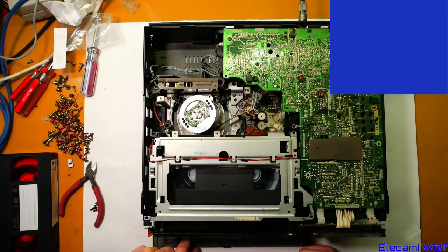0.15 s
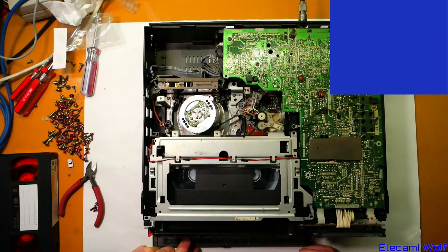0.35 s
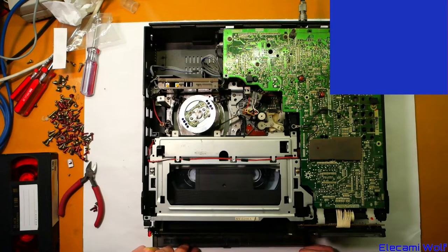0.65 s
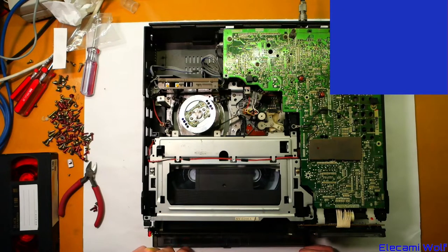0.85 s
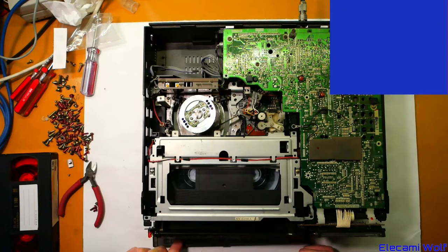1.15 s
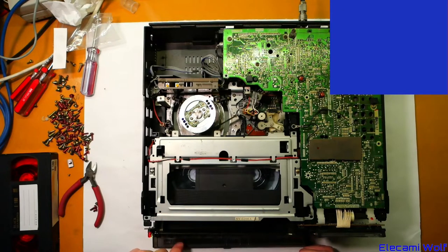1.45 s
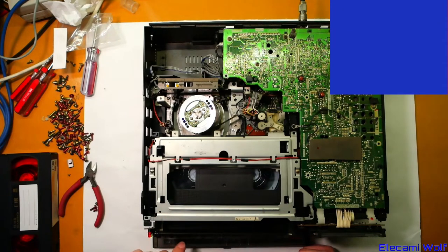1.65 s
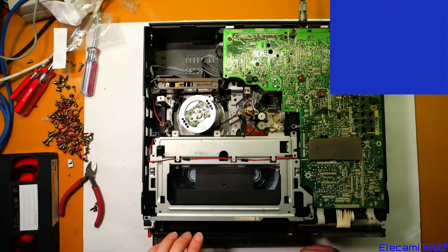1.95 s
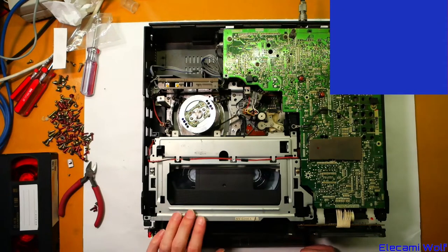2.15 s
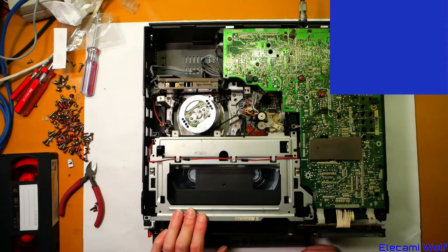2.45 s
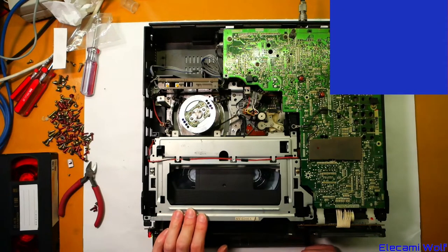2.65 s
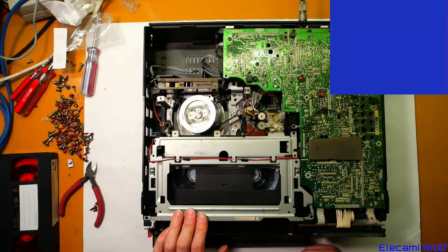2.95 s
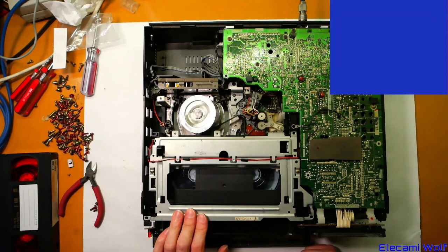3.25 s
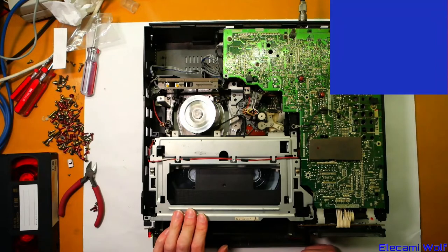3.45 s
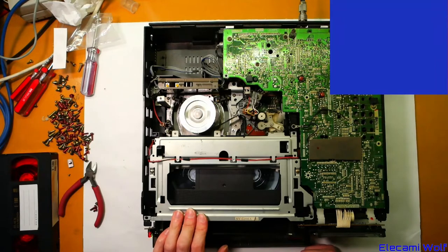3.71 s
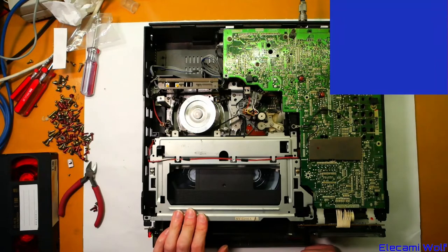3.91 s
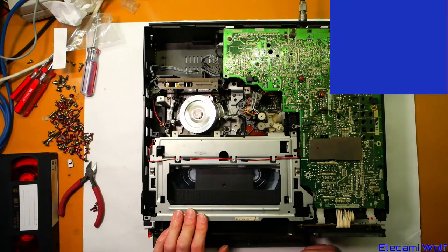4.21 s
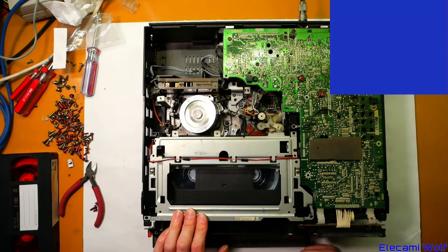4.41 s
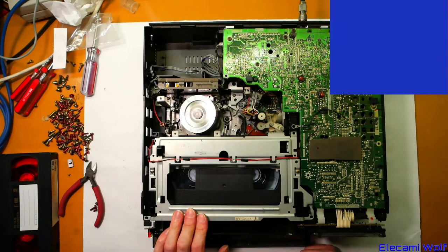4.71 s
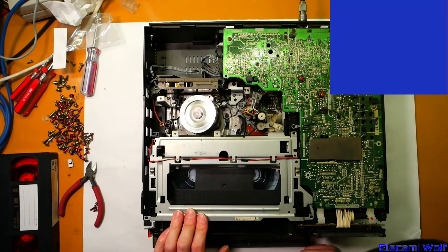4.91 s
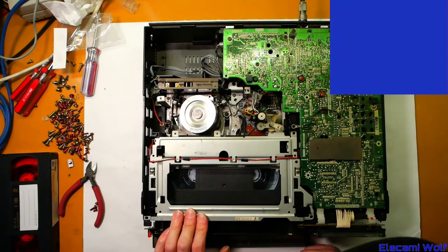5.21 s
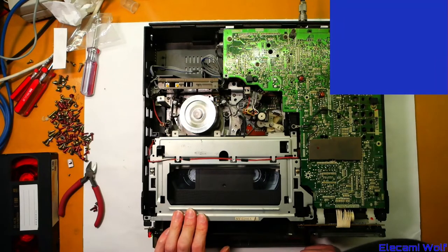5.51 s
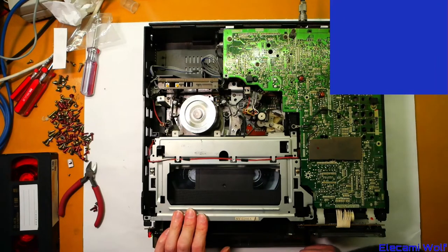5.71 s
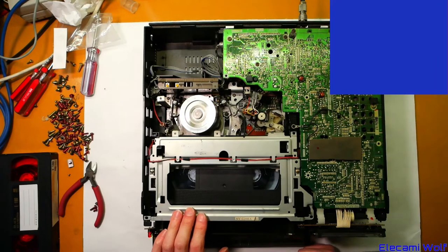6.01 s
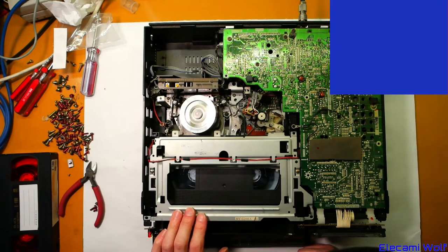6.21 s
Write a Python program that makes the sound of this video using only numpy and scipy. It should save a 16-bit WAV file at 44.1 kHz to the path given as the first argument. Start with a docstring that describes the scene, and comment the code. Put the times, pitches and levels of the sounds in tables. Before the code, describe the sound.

A tape machine with its cover off, heard closely in stereo in a small quiet room. Gritty motor whir and rattling clicks come first, ending in a heavy metallic clunk with a short ring. Tray and tape path shuffle, levers snap, a low uneven drum hum rises with thin whines, a reel ticks rapidly, and a final latch fades into faint buzzing. Gated gaps drop abruptly quieter between sounds.

```python
"""Open video recorder on a workbench

The loading motor grinds through its gears and stops with a clunk; levers click and latch, tray and tape
path shuffle, then the drum hums and whines, a reel ticks and a faint buzz ends it. Motors and rubs are
shaped noise, the hum adds wavering lines, contacts are noise bursts plus damped modes. The whole level
jumps up in bursts, holds and sinks to a lower floor, over a faint hiss.
"""
import sys
import numpy as np
from scipy import signal
from scipy.fft import rfft, irfft, next_fast_len
from scipy.io import wavfile
from scipy.ndimage import uniform_filter1d, map_coordinates

SR = 44100
rng = np.random.default_rng(int(sys.argv[2]) if len(sys.argv) > 2 else 0)


def wav_record(signal):
    """Record a signal, one row per channel, as 16-bit PCM in the file named by sys.argv[1]."""
    frames = np.transpose(np.atleast_2d(signal))
    bounded = np.clip(frames, -1, 1)
    # unit amplitude maps onto the largest positive 16-bit level
    quanta = np.round(bounded * 32767).astype(np.int16)
    wavfile.write(sys.argv[1], SR, quanta)


N = 280608
TIME = np.arange(N) / SR  # s
# left-right correlation of the machine noise: f/Hz, correlation
MACHINE_ALIKE = [(60, 0.33), (150, 0.71), (380, 0.79), (950, 0.63), (2380, 0.42), (5980, 0.32),
                 (15000, 0.94)]


def amp(db):
    """Gain of a dB value."""
    return 10 ** (np.asarray(db) / 20)


def unit(x):
    """x at rms 1."""
    return x / np.sqrt(np.mean(x ** 2) + 1e-20)


def along(points, hz):
    """Interpolate (f/Hz, value) points on a log frequency axis."""
    f, v = np.transpose(points)
    return np.interp(np.log(hz + 1), np.log(f + 1), v)


def gains(rows):
    """One gain curve per dB column after the time; -120 dB outside the table."""
    s, *columns = np.transpose(rows)
    return [amp(np.interp(TIME, s, db, left=-120, right=-120)) for db in columns]


def wobble(rate_hz):
    """Smooth random curve through rate_hz normal knots a second."""
    knots = rng.standard_normal(int(N * rate_hz / SR) + 4)
    return map_coordinates(knots, [TIME * rate_hz])


def filtered(x, response):
    """x through a complex frequency response, by FFT."""
    m = next_fast_len(N + SR // 2)
    return irfft(rfft(x, m) * response(np.fft.rfftfreq(m, 1 / SR)), m)[..., :N]


def resonances(modes):
    """Response of second-order bandpasses (f/Hz, width/Hz, level/dB) summed with alternating sign."""
    def response(f):
        total = 0
        for k, (centre, width, db) in enumerate(modes):
            damping = 1j * f * width
            total = total + (-1) ** k * amp(db) * damping / (centre * centre - f * f + damping)
        return total
    return response


def shape(spectrum):
    """Zero-phase response of a (f/Hz, level/dB) spectrum."""
    return lambda f: amp(along(spectrum, f))


def pair(response, alike, grain=1):
    """Stereo noise of rms 1 with a set left-right correlation and a shared grain."""
    def mid_side(f):
        angle = np.arccos(np.clip(along(alike, f), -1, 1)) / 2
        return response(f) * [np.cos(angle), np.sin(angle)]
    mid, side = filtered(grain * rng.standard_normal((2, N)), mid_side)
    return unit(np.array([mid + side, mid - side]))


def room():
    """Steady room noise with its own spectrum and left-right correlation."""
    # spectrum: f/Hz, relative level/dB
    room_spectrum = [(15, -49), (25, -19.5), (69, -18), (160, -7), (215, -13), (410, -8), (582, -19),
                     (997, -17.5), (1080, -17), (1270, -23.5), (3000, -20), (3440, -25.5), (5880, -29.5),
                     (9050, -43.5), (15500, -53)]
    # left-right correlation: f/Hz, correlation
    room_alike = [(60, 0.17), (240, 0.62), (950, 0.11), (3770, 0.18), (15000, 0.31)]
    return amp(-53) * pair(shape(room_spectrum), room_alike)


def loader():
    """Gear teeth chatter unevenly into the frame's resonances; the chassis drones below."""
    # motor level, falling away from the first clunk: t/s, level/dB
    motor_levels = [(0, -39), (.07, -35), (.13, -35), (.19, -43), (.29, -48), (.32, -37.5), (.41, -37),
                    (.47, -46), (.51, -38.5), (.95, -37), (1.05, -39.5), (1.15, -38), (1.2, -62.5),
                    (1.35, -78.5)]
    # frame resonances: f/Hz, width/Hz, relative level/dB
    gear_modes = [(1133, 13, -13.5), (1332, 15, 2.5), (1740, 28, -2), (2185, 15, 4.5), (2840, 33, -8.5),
                  (3497, 62, -6.5), (3515, 37, -14), (3870, 45, -7.5), (4333, 150, -15.5), (4780, 290, -9),
                  (6100, 32, -27.5), (7200, 130, -25.5)]
    # broad grinding: f/Hz, relative level/dB
    grind_spectrum = [(530, -39.5), (900, -6.5), (1230, -12.5), (1350, -7), (1580, -15.5), (1670, -2.5),
                      (1770, 0.5), (2440, -6), (4980, -17), (6120, -22), (8260, -26), (14000, -55.5)]
    # chassis drone: f/Hz, relative level/dB
    drone_spectrum = [(35, -46.5), (60, -17), (92, -4.5), (158, -3.5), (273, -6), (310, -4), (475, -11.5),
                      (531, 0.5), (580, -9), (727, 2), (994, -8.5), (1110, -8), (1200, -11), (1560, -37.5),
                      (2640, -120)]

    def frame(f):
        modes = resonances(gear_modes)(f) * (f > 900) / (1 + (f / 6000) ** 4)
        return .45 * shape(grind_spectrum)(f) + .9 * modes

    grind_gain, = gains(motor_levels)
    drone_gain = amp(-45.5) * np.minimum(1, grind_gain / amp(-46))  # even while the grind is above -46 dB
    teeth = amp(1.9 * wobble(400))
    grind = grind_gain * pair(frame, MACHINE_ALIKE, teeth)
    drone = drone_gain * pair(shape(drone_spectrum), MACHINE_ALIKE, amp(1.5 * wobble(40)))
    return grind + drone


def ring(start_s, hz, db, t60_s, attack_s):
    """One damped sine mode with a soft attack."""
    t = np.maximum(TIME - start_s, 0)
    return amp(db - 60 * t / t60_s) * (1 - np.exp(-t / attack_s)) * np.sin(2 * np.pi * hz * t)


def contacts():
    """Each contact is a rattle dying band by band, a longer room tail and chassis modes at new strengths."""
    # small plastic contacts: t/s, level/dB, knock/dB, snap/dB (last two relative)
    clicks = [(.0313, -33.5, -5, -30), (0.0536, -35, -3, -25), (0.073, -38, -26, -20),
              (0.098, -29.5, -24, -30), (.1155, -30, -7.5, -30), (0.1398, -30.5, -9.5, -30),
              (0.187, -29, -18, -18), (0.497, -37, -19, -11), (1.039, -28.5, -25, -12),
              (1.0797, -31, -23, -10), (1.1122, -29, -31, -7), (1.3242, -31.5, -7, 0),
              (1.5449, -41, -4.5, -10.5), (1.7446, -45, 11, -19), (1.773, -42, 8, -32),
              (1.785, -44.5, 7, -23), (1.8667, -40.5, 6, -25), (2.5482, -27.5, -4.5, -3),
              (2.6638, -40, -11, -25), (2.7526, -32, -22.5, -6.5), (2.7663, -40, -6, -5),
              (2.8791, -49.5, 3.5, -15.5), (3.1125, -46.5, 7.5, -15), (3.1386, -40, -6.5, -20),
              (3.156, -44, -2, -8), (3.3035, -49, 7, -14), (3.5107, -32, -11, -3.5), (3.5354, -32, -14, -4),
              (3.5814, -40, -7, -10), (4.0946, -35.5, -20, -10.5), (4.125, -43, -17, 1),
              (4.1973, -32, -16, -8), (4.2614, -30.5, -25, -5), (4.285, -42, -16, -17),
              (4.6245, -35.5, -6.5, -14), (4.8466, -40.5, -2, -20), (5.2307, -48, 7, -3),
              (5.493, -31.5, -14, -5), (5.5487, -32, -15, -25), (5.681, -44.5, -4, -9)]
    # levers latching: t/s, level/dB, thud/dB, knock/dB, snap/dB, fizz/dB (last four relative), base t60/s
    clunks = [(1.155, -5.5, -15.5, -10.5, -9, -14, 0.091), (1.1683, -10.5, -27, -8, -6, 0.5, 0.13),
              (1.5918, -19, -10.5, -3, 0, -7, 0.091), (2.552, -8.5, -23, -6.5, -1.6, -2.5, 0.064),
              (3.5204, -24.5, -40, -7.5, -2, -29, 0.1), (5.5073, -20, -7.5, -1.5, 1.1, -6, .11),
              (5.9654, -11.5, -23.5, -9, -0.8, -24, 0.056)]
    # rattle bands, thud to fizz: low edge f/Hz, high edge f/Hz, decay factor on t60
    bands = [(85, 270, 2.2), (410, 1200, 1.2), (1200, 3460, 0.86), (4250, 5200, 0.81), (7040, 3800, 0.65)]
    # chassis modes: f/Hz, relative level/dB, t60/s
    chassis = [(190, -2, 0.37), (615, 2, 0.15), (742, -5, 0.1), (799, -0.5, 0.15), (915, -7.5, 0.22),
               (1200, -9, 0.076), (1400, -7, 0.07), (1834, -5, 0.12), (1982, -4.5, .11), (2104, -8, 0.083),
               (2375, -9.5, 0.073), (2790, -8.5, 0.11), (3200, -8, 0.047), (5800, -14, 0.058),
               (6200, -12.5, 0.064)]
    # loose parts left ringing (bench thump, spring, plate): t/s, f/Hz, level before attack/dB, t60/s, attack/s
    loose_parts = [(1.07, 49.6, -33, 0.26, 0.022), (1.17, 1124, -32.5, 0.89, .004),
                   (1.17, 588.4, -37, 0.42, .006), (2.552, 1200, -39.5, 0.33, 0.0043),
                   (5.969, 2390, -40, 0.41, .003)]
    # left-right correlation of the rattle: f/Hz, correlation
    blow_alike = [(100, 1), (700, 0.95), (2000, 0.68), (5000, 0.76), (12000, 0.8)]
    # phase lead of left over right: f/Hz, lead/rad
    left_lead = [(100, .3), (700, -0.56), (1200, -0.51), (2500, -1.05), (4000, -1.9), (7000, -0.68),
                 (15000, -0.83)]
    thud_under_knock_db, fizz_under_snap_db, click_t60_s = -6, -12.5, .065
    left_minus_right_db = -0.3

    hits = list(clunks)
    for s, db, knock, snap in clicks:
        hits.append((s, db, knock + thud_under_knock_db, knock, snap, snap + fizz_under_snap_db, click_t60_s))

    t = np.arange(SR // 2) / SR
    envelopes, modes = np.zeros((len(bands), 2, N + SR)), np.zeros((2, N + SR))
    scatter_db = rng.normal(0, 1.6, (len(hits), len(chassis)))
    mode_waves = np.array([amp(db - 60 * t / t60) * np.sin(2 * np.pi * hz * t) for hz, db, t60 in chassis])
    mode_hz = np.transpose(chassis)[0]
    for (s, db, thud, knock, snap, fizz, t60), spread in zip(hits, scatter_db):
        at = slice(round(s * SR), round(s * SR) + len(t))
        for envelope, level, (_, _, slow) in zip(envelopes, (thud, knock, 0, snap, fizz), bands):
            rattle_decay = amp(-60 * t / (t60 * slow))
            room_tail = amp(-20.5 - 60 * t / (.42 * slow))
            crack = 1.3 * amp(-60 * t / 0.013)
            onset = 1 - np.exp(-t / (0.00051 * slow ** 2))
            envelope[:, at] += amp(db + level - 7) * (rattle_decay + room_tail + crack) * onset
        colour_db = np.select([mode_hz < 400, mode_hz < 1200, mode_hz > 4000], [thud, knock, snap])
        modes[:, at] += amp(db + colour_db + spread - 14.5) @ mode_waves

    def low_pass(f, hz):
        return 1 / (1 + (f / hz) ** 6)

    grain = amp(1.8 * wobble(450))
    blows = sum(ring(*row) for row in loose_parts)
    for envelope, (low_hz, high_hz, _) in zip(envelopes, bands):
        noise = pair(lambda f: low_pass(f, high_hz) ** 0.78 * (1 - low_pass(f, low_hz)), blow_alike, grain)
        # high-pass limits the spill of sudden starts below the band
        blows = blows + filtered(envelope[:, :N] * noise, lambda f: 1 / (1 - 1j * .6 * low_hz / (f + 1)) ** 2)
    blows = blows + filtered(modes[:, :N], lambda f: 1 / (1 - 1j * 90 / (f + 1)) ** 2)

    def placement(f):
        left = amp(left_minus_right_db / 2) * np.exp(.5j * along(left_lead, f))
        return left ** np.array([[1], [-1]])  # right is the inverse

    return filtered(blows, placement)


def shuffle():
    """Tray and tape path: a low scrape through the bench and a grainy rub above it."""
    # t/s, rumble level/dB, rub level/dB
    shuffle_levels = [(1.2, -56, -77), (1.35, -48.5, -51), (1.62, -52.5, -58.5), (1.85, -43.5, -53),
                      (1.98, -50, -56.5), (2.05, -65.5, -67.5), (2.5, -82.5, -77.5), (2.6, -49.5, -52.5),
                      (3.0, -53, -57), (3.7, -50.5, -52.5), (3.95, -56.5, -57), (4.22, -50.5, -50),
                      (4.6, -55.5, -55.5), (5.4, -52.5, -56), (5.55, -49.5, -52.5), (5.7, -49, -50),
                      (5.85, -57, -60.5), (6.37, -60.5, -62.5)]
    # low scrape: f/Hz, relative level/dB
    rumble_spectrum = [(24, -38), (40, -7.5), (69, -4.5), (172, 0.5), (275, -4.5), (423, -3), (483, -7),
                       (599, -10.5), (700, -13.5), (910, -39.5), (1540, -120)]
    # rub: f/Hz, relative level/dB
    rub_spectrum = [(350, -34.5), (600, -7.5), (741, -3.5), (1000, -10.5), (1410, -11), (2390, -11),
                    (3420, -19), (4330, -17.5), (5010, -21.5), (7840, -28), (14000, -52.5)]
    rumble_gain, rub_gain = gains(shuffle_levels)
    rub_grain = amp(2.3 * wobble(300) + 1.5 * wobble(40))
    rumble = rumble_gain * pair(shape(rumble_spectrum), MACHINE_ALIKE, amp(1.2 * wobble(30)))
    return rumble + rub_gain * pair(shape(rub_spectrum), MACHINE_ALIKE, rub_grain)


def swell(start_s, end_s, db):
    """Gain that fades in, holds and fades out, straight in dB."""
    fade_s, drop_db = 0.038, 19
    times = [start_s - fade_s, start_s, end_s, end_s + fade_s]
    levels = [db - drop_db, db, db, db - drop_db]
    return amp(np.interp(TIME, times, levels, left=-120, right=-120))


def drum():
    """Hum is resonant noise plus two wavering lines; whine and whistle are rough narrow noise bands."""
    # drum hum runs up, rises and falls unevenly, runs down: t/s, level/dB
    drum_levels = [(2.6, -77), (2.8, -57.5), (3.3, -49), (3.5, -55.5), (3.6, -50.5), (4.05, -54),
                   (4.2, -44.5), (4.4, -51.5), (4.75, -52), (4.9, -49.5), (5.2, -47), (5.35, -51.5),
                   (5.52, -42.5), (5.7, -53), (5.8, -69), (6.36, -73.5)]
    # hum resonances before the 1.3 power: f/Hz, width/Hz, relative level/dB
    hum_modes = [(182, 14, 0), (370, 12, -10.5), (550, 24, -4.5), (612, 55, -7.5), (730.7, 22, 1.5),
                 (882.3, 30, -6)]
    # wavering hum lines: centre f/Hz, median level over the hum gain/dB, pitch wander/Hz
    cogging = [(357, -6, 1.1), (755, -11, 8.2)]
    # whine resonance before squaring: f/Hz, width/Hz, relative level/dB
    whine_modes = [(2420, 59, 0)]
    # whine comes and goes: start t/s, end t/s, level/dB
    whine_swells = [(3.6, 3.85, -57.5), (4.136, 4.496, -55.5), (4.643, 4.917, -57), (5.13, 5.22, -57),
                    (5.425, 5.495, -59.5)]
    # lower whistle's resonance before squaring: f/Hz, width/Hz, relative level/dB
    whistle_modes = [(1604, 60, 0)]
    # whistle during run-up: start t/s, end t/s, level/dB
    whistle_span = (2.8, 3.45, -63.5)

    def narrow(modes):
        return pair(lambda f: resonances(modes)(f) ** 2, MACHINE_ALIKE)

    hum_gain, = gains(drum_levels)
    lines = 0
    for hz, db, wander_hz in cogging:
        phase = 2 * np.pi * np.cumsum(hz + wander_hz * wobble(13)) / SR
        lines = lines + amp(db + wobble(25)) * np.sin(phase)
    body = pair(lambda f: np.abs(resonances(hum_modes)(f)) ** 1.3, MACHINE_ALIKE, amp(2.8 * wobble(30)))
    whine = sum(swell(*row) for row in whine_swells) * narrow(whine_modes)
    whistle = swell(*whistle_span) * narrow(whistle_modes)
    return hum_gain * (body + lines) + whine + whistle


def reel():
    """A turning reel ticks once a turn, slightly uneven in time and strength, into short plastic modes."""
    # first t/s, end t/s, period/s
    first_s, end_s, period_s = (4.575, 5.92, .0678)
    # tick modes: f/Hz, relative level/dB, t60/s
    tick_modes = [(4350, -0.5, 0.0076), (3350, -7.5, .008), (5180, -7.5, 0.008), (725, 3, .07)]
    times = np.arange(first_s, end_s, period_s)
    chance = rng.standard_normal((len(times), 2))
    impulses, t = np.zeros(N), np.arange(SR // 20) / SR
    at = np.round((times + .0008 * chance[:, 0]) * SR).astype(int)
    impulses[at] = amp(-49.5 + 2.0 * chance[:, 1])
    tick = sum(amp(db - 60 * t / t60) * np.sin(2 * np.pi * hz * t) for hz, db, t60 in tick_modes)
    return signal.fftconvolve(impulses, tick)[:N]


def buzz():
    """As the drum dies away, regular blips of uneven size excite one short mode."""
    # start t/s, rate/Hz
    start_s, rate_hz = (5.866, 50)
    # f/Hz, median level before attack/dB, t60/s
    hz, db, t60_s = (1730, -49.5, 0.02)
    times = np.arange(start_s, N / SR, 1 / rate_hz)
    impulses, t = np.zeros(N), np.arange(SR // 20) / SR
    impulses[(times * SR).astype(int)] = amp(db + 3.2 * rng.standard_normal(len(times)))
    blip = amp(-60 * t / t60_s) * (1 - np.exp(-t / .001)) * np.sin(2 * np.pi * hz * t)
    return signal.fftconvolve(impulses, blip)[:N]


def burst_gain():
    """Gain of the whole sound: a jump within a few ms, a hold, then a fade straight in amplitude."""
    # jump t/s, fade start t/s, fade/s
    burst_times = [(0, .138, 0.082), (0.188, 0.224, 0.095), (.292, 0.443, 0.063), (0.497, 1.299, 0.17),
                   (1.544, 1.65, 0.13), (1.745, 1.776, 0.1), (1.848, 1.881, .15), (2.543, 2.603, .16),
                   (2.754, 2.765, 0.17), (2.88, 2.889, 0.11), (3.113, 3.132, 0.14), (3.3, 3.317, 0.095),
                   (3.51, 3.573, 0.12), (3.712, 3.756, .12), (4.094, 4.292, .12), (4.625, 4.645, 0.1),
                   (4.836, 4.862, 0.093), (5.005, 5.028, 0.095), (5.156, 5.686, 0.12), (5.965, 5.987, 0.15)]
    # short dip: start t/s, end t/s, level/dB
    dip_start_s, dip_end_s, dip_db = (5.838, 5.858, -19)
    jump_s, floor = 0.0028, amp(-17)
    gain = np.zeros(N)
    for up_s, sink_s, fade_s in burst_times:
        rise = np.clip((TIME - up_s) / jump_s + (up_s == 0), 0, 1)  # already up at t = 0
        fall = np.clip(1 - (TIME - sink_s) / fade_s, 0, 1)
        gain = np.maximum(gain, rise * fall)
    in_dip = (TIME > dip_start_s) & (TIME < dip_end_s)
    dip = uniform_filter1d(np.where(in_dip, amp(dip_db), 1.), size=100)
    return (floor + (1 - floor) * gain) * dip


def scene():
    """The machine leans right over most of the band; room noise lies around it."""
    # balance: f/Hz, left minus right/dB
    lean = [(60, -5), (150, -4), (400, 0), (1400, -1.5), (4000, -3.5), (9000, -1.5)]
    machine = loader() + contacts() + shuffle() + drum() + reel() + buzz()
    return filtered(machine, lambda f: amp(along(lean, f) / 2 * [[1], [-1]])) + room()


def record(dry):
    """Apply the bursts, add steady hiss, clip the loudest peaks softly and limit the band."""
    hiss_db, clip_level, top_hz = -85, .93, 15820
    x = dry * burst_gain() + amp(hiss_db) * rng.standard_normal(dry.shape)
    x = x / (1 + np.abs(x / clip_level) ** 8) ** (1 / 8)
    return filtered(x, lambda f: np.clip((top_hz - f) / 250, 0, 1))


dry = scene()
out = record(dry)
wav_record(out)
```